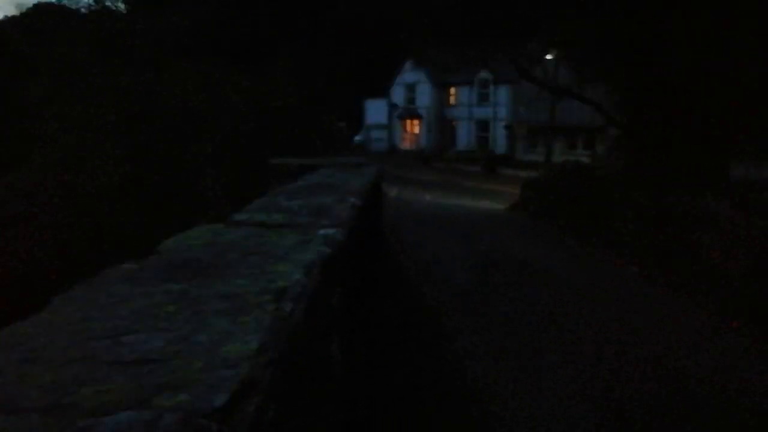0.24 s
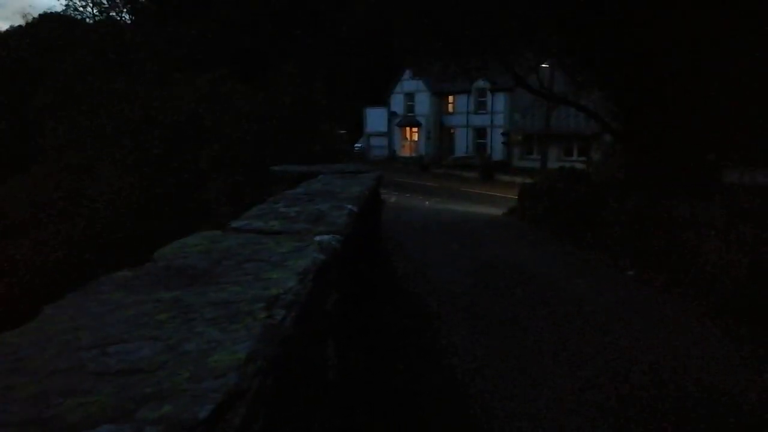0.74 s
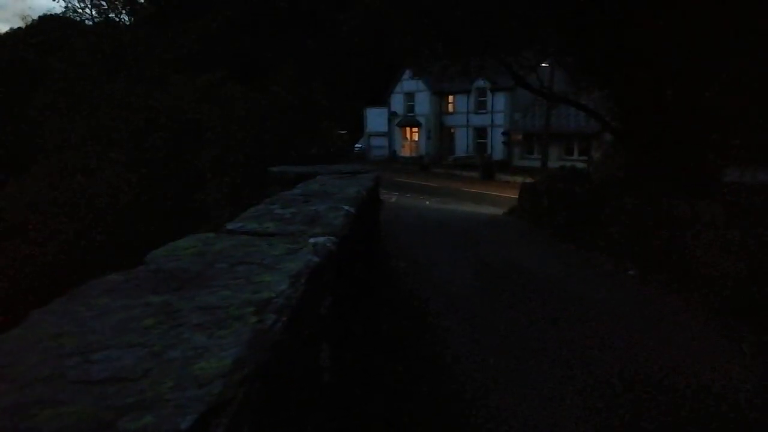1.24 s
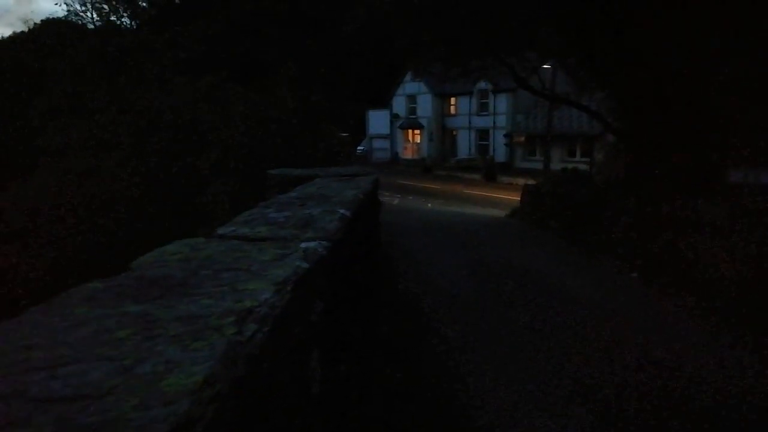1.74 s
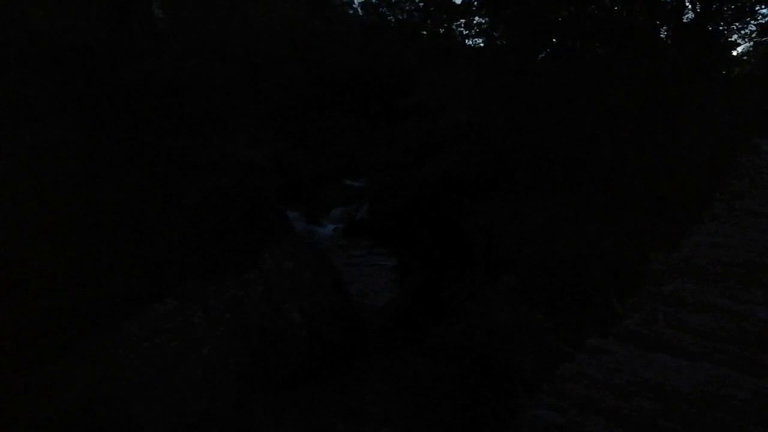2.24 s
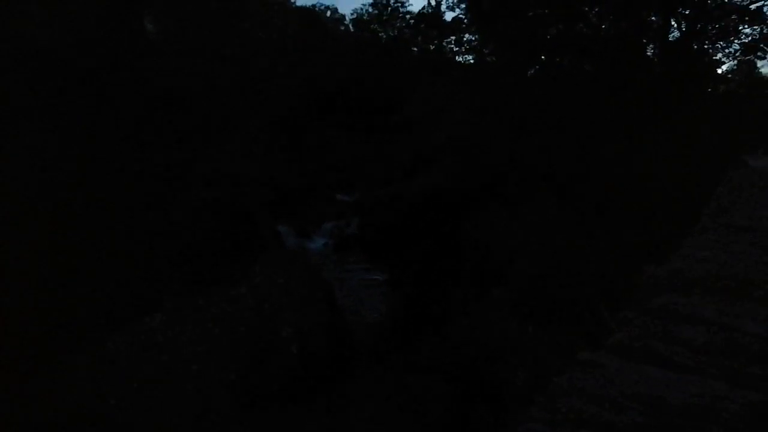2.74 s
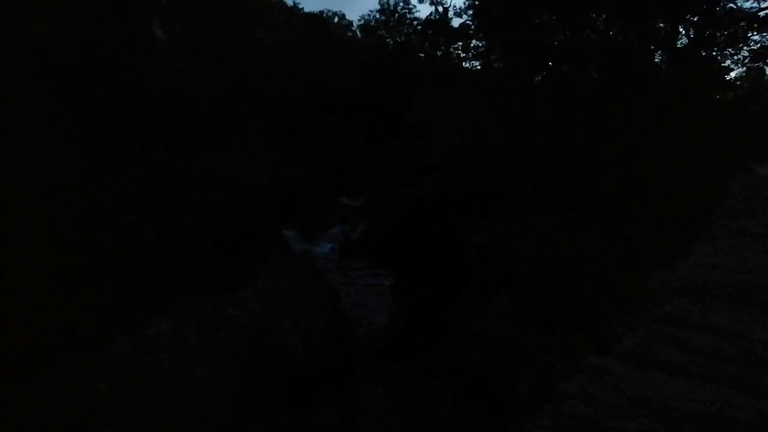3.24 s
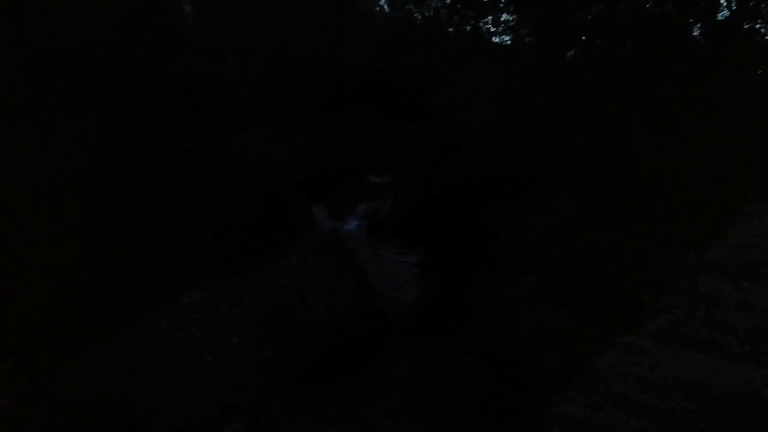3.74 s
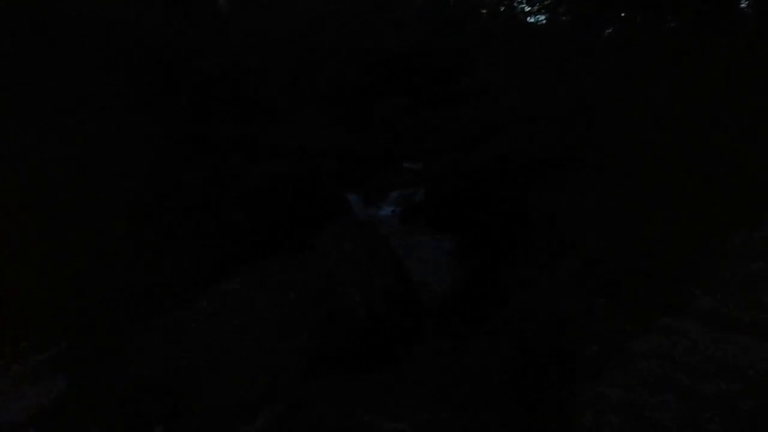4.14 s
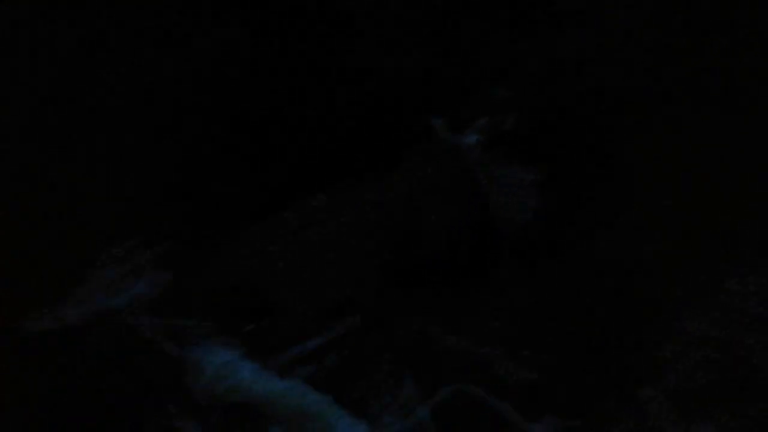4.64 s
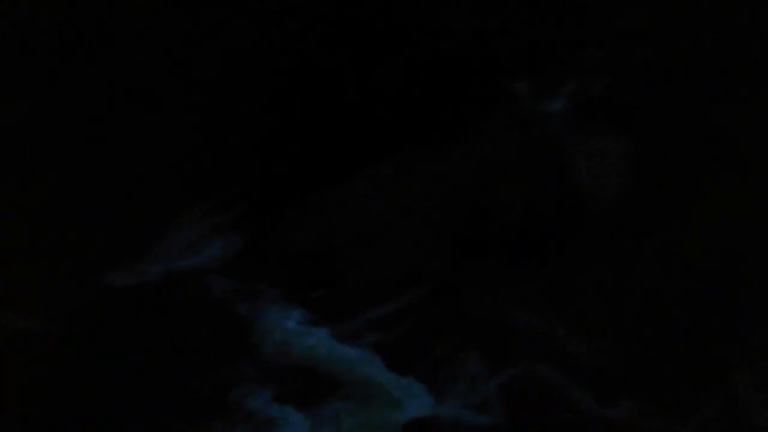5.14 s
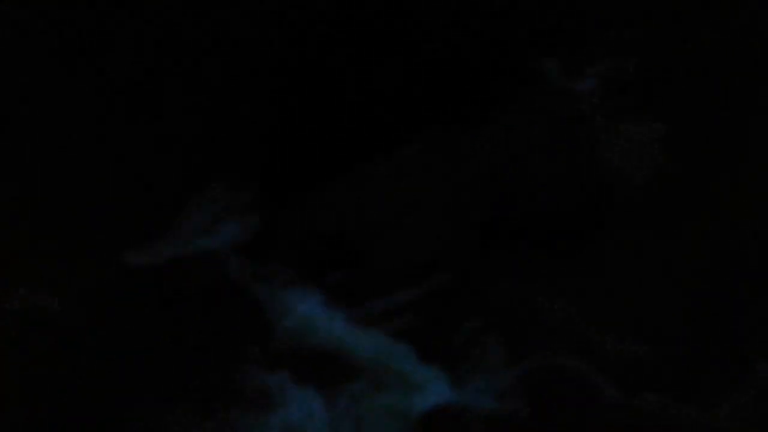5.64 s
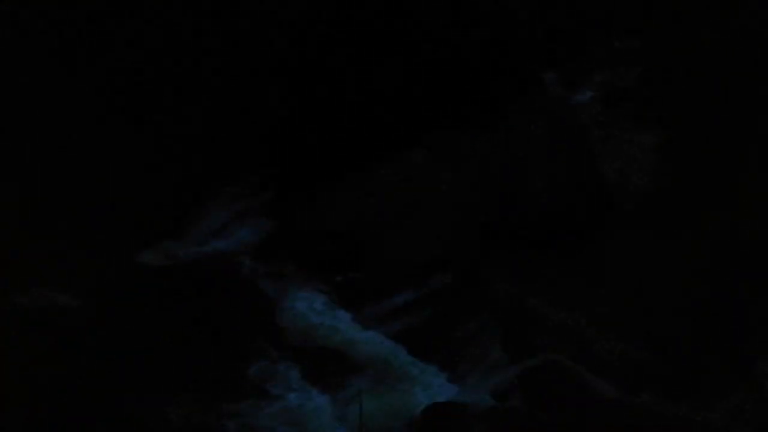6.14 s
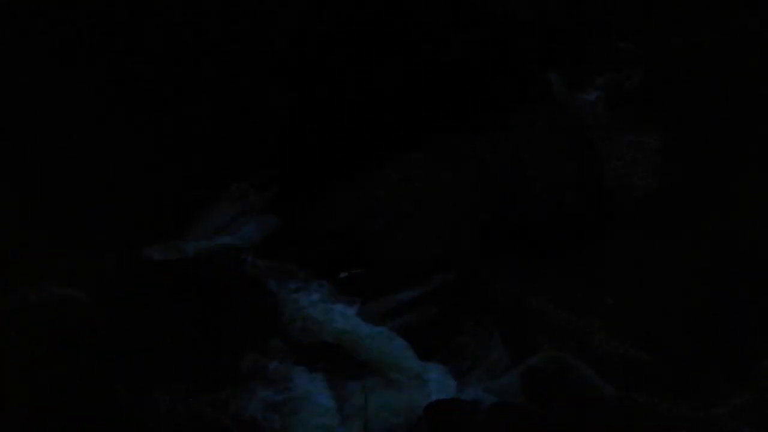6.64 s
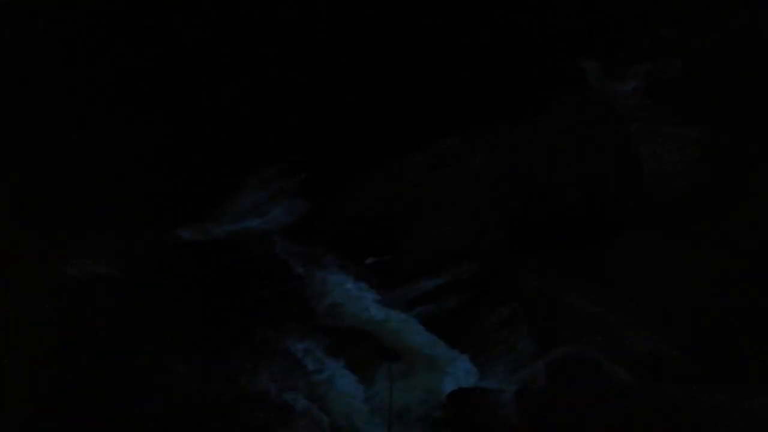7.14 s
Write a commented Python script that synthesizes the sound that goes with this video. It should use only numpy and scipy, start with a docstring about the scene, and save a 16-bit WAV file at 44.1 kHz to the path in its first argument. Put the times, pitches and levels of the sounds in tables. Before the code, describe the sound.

A mountain river rushes, partly screened by a stone wall, then abruptly opens into brighter, louder rapids on the right, with two small close knocks.

```python
"""Mountain river under a stone bridge

A river rushes over rocks, heard with two ears: shaped noise that surges, splashes and gurgles.
At first the parapet screens the water; then, abruptly, the rapids lie open on the right.
The head turns and leans over the wall, so moving resonances make the right ear ring brighter.
Two small knocks sound close by, each made of a short push, a clack and a dull ring."""
import sys
import numpy as np
from scipy import signal
from scipy.io import wavfile

SR = 44100
rng = np.random.default_rng(int(sys.argv[2]) if len(sys.argv) > 2 else 0)


def materialize(psi):
    """Save the field psi as 16-bit PCM at rate SR to the path in sys.argv[1].

    A 1-D psi becomes a single channel; in a 2-D psi each row is a channel.
    """
    bounded = np.clip(np.atleast_2d(psi).T, -1, 1)
    quanta = np.round(bounded * 32767).astype(np.int16)
    wavfile.write(sys.argv[1], SR, quanta)


N = 325458  # length in samples
FRAME, HOP = 1024, 256  # length and step of the short-time spectra, in samples
HZ = np.fft.rfftfreq(FRAME, 1 / SR)
TIMES = np.arange(-(-N // HOP) + 1) * HOP / SR  # time of each frame, in seconds


def gain_of(db):
    """Turns decibels into amplitude."""
    return 10 ** (np.asarray(db) / 20)


def over_hz(table):
    """Reads the columns of a table at every frequency, joining the points on a log axis."""
    hz, *columns = np.transpose(table)
    return np.squeeze([np.interp(np.log(HZ + 1), np.log(hz + 1), column) for column in columns])


def bell(centre_hz, width_hz):
    """The outline of a resonance, 1 at its centre."""
    return 1 / (1 + (2 * (HZ - centre_hz) / width_hz) ** 2)


def above(corner_hz):
    """A weight that rises from 0 in the bass, through a half at the corner, toward 1."""
    return HZ ** 2 / (HZ ** 2 + corner_hz ** 2)


def ease(x, middle, length):
    """A smooth move from 0 to 1, of this length and centred on the middle."""
    progress = np.clip((x - middle) / length, -0.5, 0.5)
    return 0.5 + 0.5 * np.sin(np.pi * progress)


def white():
    """Short-time spectra (frames, frequencies) of white noise at 0 dB per Hz."""
    noise = rng.standard_normal(N) * np.sqrt(SR / 2)
    return signal.stft(noise, nperseg=FRAME, noverlap=FRAME - HOP)[2].T


def drift(seconds, span_hz):
    """Random ups and downs of spread 1, smoothed over about this much time and frequency."""
    shape = (len(TIMES), len(HZ))
    field = np.fft.rfft2(rng.standard_normal(shape))
    rate = np.fft.fftfreq(len(TIMES), HOP / SR)[:, None]
    ripple = np.fft.rfftfreq(len(HZ), HZ[1])
    smooth = np.exp(-(ripple * span_hz) ** 2) / np.hypot(1, 2 * np.pi * rate * seconds)
    field = np.fft.irfft2(field * smooth, shape)
    return (field - field.mean()) / field.std()


def white_water(left_db, right_db, likeness, surge_db, splash_db, gurgle_db):
    """Countless bubbles merge into a noisy rush that surges, splashes in the treble and gurgles lower."""
    same = likeness[0] + 1j * likeness[1]
    same = same / np.maximum(abs(same), 1)
    # long waves reach both ears alike, in timing and in level
    same = 1 + (same - 1) * above(70)
    left_db = right_db + (left_db - right_db) * above(150)

    # the left ear shares part of the right ear's noise; fresh noise fills the rest
    right = white()
    left = same * right + np.sqrt(np.maximum(1 - abs(same) ** 2, 0)) * white()

    surge = surge_db * drift(seconds=0.08, span_hz=30500)
    splash = splash_db * drift(seconds=0.016, span_hz=7000) * above(5000)
    # the finest drops come in gusts
    spray = splash_db * drift(seconds=0.047, span_hz=12000) * bell(14500, 6000)
    gurgle = gurgle_db * drift(seconds=0.014, span_hz=350) * bell(1600, 2600)

    ears = np.array([left * gain_of(left_db), right * gain_of(right_db)])
    ears = ears * gain_of(surge + splash + spray + gurgle)
    return signal.istft(ears.transpose(0, 2, 1), nperseg=FRAME, noverlap=FRAME - HOP)[1][:, :N]


def river_from_road():
    """Behind the parapet the rush is screened, and all but its bass sinks slowly."""
    # basic rush in each ear: f/Hz, level/dB per Hz
    road_left = [(21.5, -88), (86.1, -60.5), (635.0, -68.5), (1040.0, -66), (1350.0, -74), (1730.0, -70.5),
                 (2220.0, -73.9), (5290.0, -75), (7100.0, -73), (9420.0, -77), (10700.0, -82),
                 (13800.0, -87.9), (15100.0, -91.7), (15400.0, -95.2)]
    road_right = [(21.5, -75), (86.1, -63), (334.0, -63), (560.0, -72), (1180.0, -63.5), (2220.0, -63.5),
                  (4110.0, -69.5), (6580.0, -64.5), (7870.0, -68.5), (9420.0, -75.5), (10700.0, -89),
                  (11500.0, -85), (14300.0, -100.4), (15400.0, -107.0)]
    # likeness of the ears: f/Hz, share in phase, share with left a quarter cycle ahead
    road_likeness = [(40, 0.995, 0.091), (150, 1, -0.28), (330, 0.45, 0.84), (520, -0.47, 0.82),
                     (1200, -0.051, 0.64), (1650, -0.15, -0.63), (2100, -0.005, -0.56), (2500, -0.15, 0.45),
                     (3100, -0.046, 0.17), (3700, 0.062, -0.32), (4700, 0.011, 0.067), (6000, -0.011, 0.1)]
    fade_db_per_s = 0.48

    shelter_db = (0.4 - fade_db_per_s * TIMES[:, None]) * above(500)
    # the hollow of the left ear rings
    left_db = over_hz(road_left) + 13 * bell(8220, 1580)
    # the folds of the right ear notch and ripple the sound
    right_db = over_hz(road_right) - 2.4 * bell(4200, 600) + 3.5 * bell(10800, 700)
    return white_water(left_db + shelter_db, right_db + shelter_db, over_hz(road_likeness),
                       surge_db=0.54, splash_db=1.0, gurgle_db=0.4)


def knocks(far_db=-12, clack_hz=1600, clack_db=-16):
    """A brief push, a short clack and a dull ring; the far ear gets them later, softer and rounder."""
    # small knocks near the right ear, before travel to the ears:
    # t/s, push level/dB, push length/s, ring f/Hz, ring level below the push/dB
    knock_table = [(1.8873, -7.5, .00013, 170, -22), (2.3094, -18, .00041, 380, -7)]
    # left then right: travel delay/s, level/dB, stretch of the push
    paths = [(0.0006, far_db, 2.9), (0.00053, 0, 0.96)]

    out = np.zeros((2, N))
    for start_s, db, push_s, ring_hz, ring_db in knock_table:
        for ear, (delay_s, shadow_db, stretch) in enumerate(paths):
            t = np.maximum(np.arange(N) / SR - start_s - delay_s, 0)
            u = t / (push_s * stretch)
            push = u ** 2 * np.exp(1 - u ** 2)
            clack = gain_of(clack_db) * np.sin(2 * np.pi * clack_hz * t) * np.exp(-t / 0.002)
            ring = gain_of(ring_db) * np.sin(2 * np.pi * ring_hz * t) * np.exp(-t / 0.0034)
            out[ear] += gain_of(db + shadow_db) * (push + clack + ring)
    return out


def head_pose():
    """How far the head has turned toward the fall and leaned over the wall, both 0-1, at every frame."""
    # separate moves of the head: middle t/s, length/s, share of the whole turn
    head_turns = [(2.42, 0.39, .37), (3.01, 0.18, 0.27), (3.62, 1.0, 0.22)]
    t = TIMES[:, None]
    facing = 0.1  # share of the turn already made at the parapet
    for middle_s, length_s, share in head_turns:
        facing = facing + share * ease(t, middle_s, length_s)
    lean = ease(t, middle=4, length=1.9)  # one slow lean, in seconds
    return np.clip(facing, 0, 1), lean


def right_ear(facing, lean):
    """Colours the right ear, in dB: loudest square on to the water, ringing higher and harder later."""
    square_on, square_width, square_db = 0.43, 0.19, 2  # shares of the turn, and gain when square on
    shut_hz, open_hz = 7500, 8390  # the ear's resonance before and after its hollow opens to the spray
    shut_db, open_db, lean_db = 4.5, 10.5, 2  # height of the resonance, and what leaning adds
    wall_db, spray_db = -1.0, 5  # turned but upright: the wall screens the rush, fine spray carries over
    notch_db = 2.5  # depth of the ear's notch while upright

    hollow = ease(facing, middle=0.557, length=0.28)  # in shares of the turn
    behind_wall = hollow * (1 - lean)
    square_gain_db = square_db * np.exp(-((facing - square_on) / square_width) ** 2)
    exposure_db = (square_gain_db + wall_db * behind_wall) * above(600)

    ear_hz = shut_hz + (open_hz - shut_hz) * hollow
    ear_db = shut_db + (open_db - shut_db) * hollow + lean_db * lean
    ringing_db = ear_db * bell(ear_hz, 1860)

    # the notch climbs as the ear comes round and fills in with the lean
    notch_hz = 4750 + 1050 * facing
    dip_db = notch_db * (1 - lean) * bell(notch_hz, 1500)
    fine_spray_db = spray_db * behind_wall * (bell(12500, 2400) - 0.7 * bell(10000, 1000))
    return exposure_db + ringing_db - dip_db + fine_spray_db


def river_from_parapet():
    """Open rapids: the head shadows the left ear while the right ear turns toward the fall."""
    # basic rush in the left ear, then in the right ear before and after the move: f/Hz, level/dB per Hz
    river_left = [(21.5, -72), (108.0, -61.5), (258.0, -59.5), (635.0, -73), (926.0, -64.4),
                  (1530.0, -71.5), (4650.0, -70), (5290.0, -72.2), (7870.0, -71), (9420.0, -73),
                  (10700.0, -79.5), (14300.0, -90.5), (15100.0, -99), (15400.0, -101.0)]
    parapet_right = [(21.5, -81), (86.1, -60.5), (377.0, -60.5), (560.0, -72.5), (926.0, -63),
                     (2220.0, -59), (5050.0, -66), (6580.0, -63.5), (7350.0, -64.5), (8650.0, -64.5),
                     (11500.0, -72), (12500.0, -80), (14800.0, -87), (15400.0, -87.3)]
    over_fall_right = [(21.5, -73), (151.0, -59.5), (291.0, -61), (431.0, -68), (818.0, -61.5),
                       (1530.0, -61), (2510.0, -63), (4650.0, -62), (5050.0, -63.5), (7100.0, -61),
                       (9420.0, -68.5), (11200.0, -79.7), (13300.0, -79), (15400.0, -82.6)]
    # likeness of the ears, upright and leaning:
    # f/Hz, share in phase, share with left a quarter cycle ahead
    parapet_likeness = [(40, 0.995, 0.0), (200, 0.956, 0.012), (373, 0.89, 0.43), (566, -0.34, -0.087),
                        (780, 0.24, 0.26), (1150, 0.76, 0.1), (1550, 0.15, -0.0011), (2040, -0.14, -0.03),
                        (2500, -0.28, 0.33), (3100, 0.15, -0.013), (4300, -0.16, 0.01), (6000, 0.0092, 0.0)]
    over_fall_likeness = [(40, 1, 0.0), (200, 0.97, -0.0036), (370, 0.87, -0.23), (537, -0.9, -0.32),
                          (750, 0.68, 0.46), (1000, 0.33, 0.04), (1510, 0.75, 0.27), (2000, 0.067, -0.24),
                          (2550, -0.3, 0.03), (3200, 0.31, 0.083), (4300, -0.15, -0.02),
                          (6000, 0.00004, 0.0)]
    # one larger splash brightens the right ear for a moment
    splash_s, splash_length_s, splash_peak_db = 2.54, 0.044, 1.5

    facing, lean = head_pose()
    # leaning shifts the wall's reflection, which colours the low notes; turning colours the high ones
    toward_fall = lean + (facing - lean) * above(1100)
    right_db = (1 - toward_fall) * over_hz(parapet_right) + toward_fall * over_hz(over_fall_right)
    splash_shape = np.exp(-((TIMES[:, None] - splash_s) / splash_length_s) ** 2)
    right_db = right_db + right_ear(facing, lean) + splash_peak_db * splash_shape * above(4000)

    left_db = over_hz(river_left) + 13 * bell(8570, 1740) - 0.9 * bell(11500, 6000)
    # sound that creeps round the head ripples the shadowed ear, and the shadow deepens with the lean
    shadow_db = 2.4 * bell(960, 700) + 1.8 * bell(2500, 900) + 1.5 * bell(7200, 1400)
    left_db = left_db + 1.5 * bell(1800, 400) + (0.5 - lean) * shadow_db

    upright_likeness = over_hz(parapet_likeness)[:, None]
    leaning_likeness = over_hz(over_fall_likeness)[:, None]
    likeness = (1 - lean) * upright_likeness + lean * leaning_likeness
    return white_water(left_db, right_db, likeness, surge_db=0.32, splash_db=0.35, gurgle_db=0.5)


def scene():
    """The screened river gives way to the open rapids within a few milliseconds; knocks sound on top."""
    open_s, crossing_s = 1.977, 0.0049  # when the rapids come into the open, and how long that takes
    opened = np.clip((np.arange(N) / SR - open_s) / crossing_s + 0.5, 0, 1)
    screened_river = np.sqrt(1 - opened) * river_from_road()
    open_river = np.sqrt(opened) * river_from_parapet()
    return screened_river + open_river + knocks()


def record(dry):
    """A steep low-pass filter cuts away the highest treble."""
    edge_hz = 15760
    taps = signal.firwin(1023, edge_hz, window=("kaiser", 9), fs=SR)
    return signal.oaconvolve(dry, taps[None], "same")


dry = scene()
out = record(dry)
materialize(out)
```